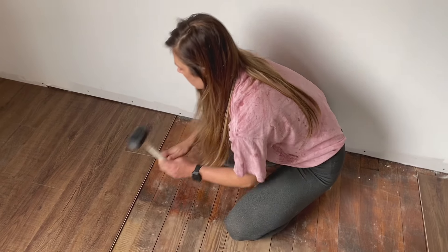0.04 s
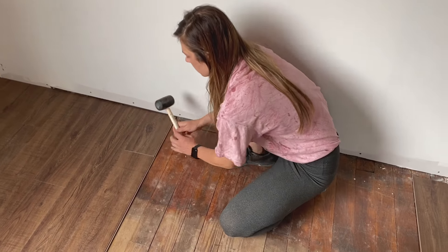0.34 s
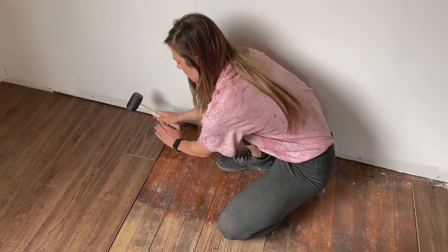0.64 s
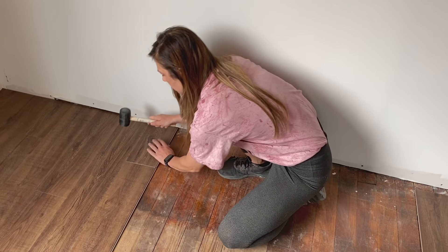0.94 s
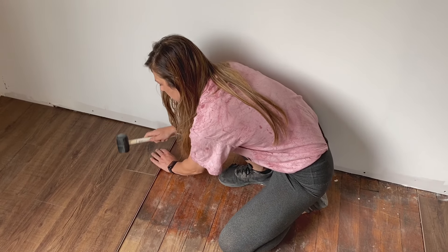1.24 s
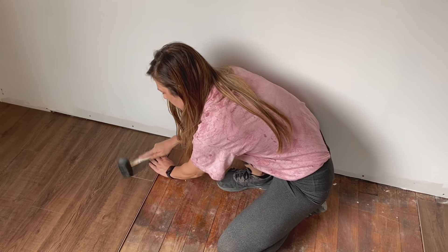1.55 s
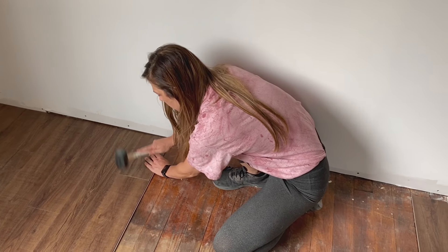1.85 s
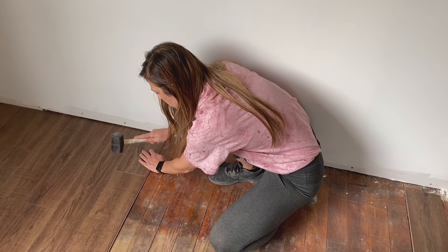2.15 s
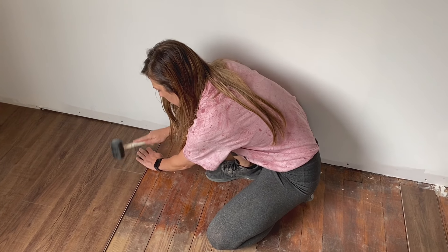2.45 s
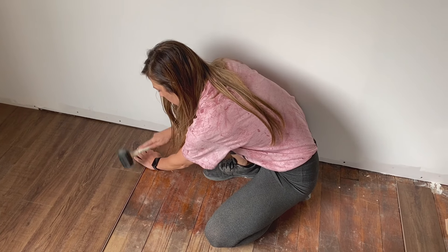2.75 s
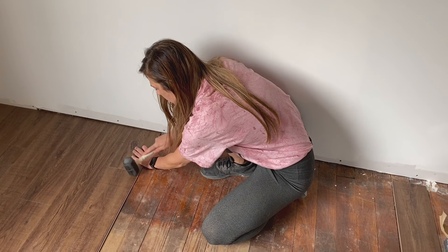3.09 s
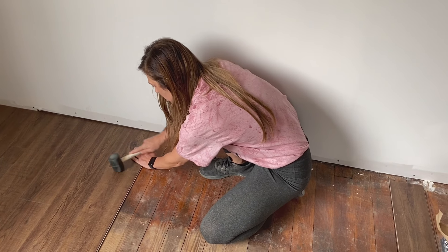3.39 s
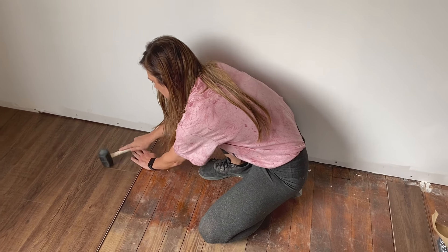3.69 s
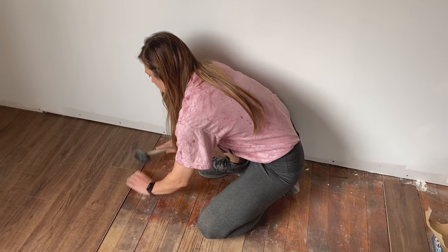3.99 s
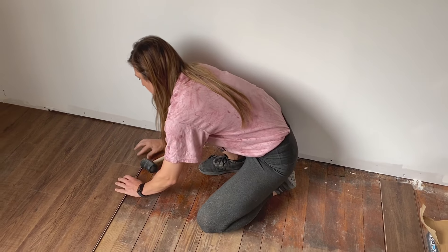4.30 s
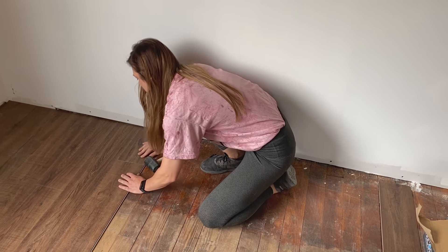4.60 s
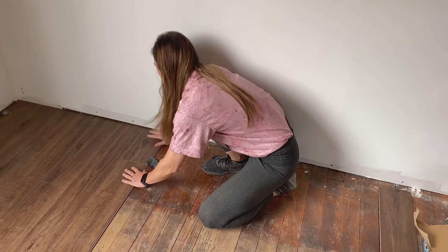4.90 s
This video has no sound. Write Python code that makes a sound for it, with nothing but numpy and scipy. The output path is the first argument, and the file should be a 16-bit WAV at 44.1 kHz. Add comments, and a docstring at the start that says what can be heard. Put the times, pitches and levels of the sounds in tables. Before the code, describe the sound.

A bare, echoing room is heard in stereo from close to a kneeling worker. A faint echo dies away at the start. From about 0.3 to 1.4 seconds come soft bumps and scuffs on the floorboards, a slight rustle of clothes and a tiny tick. At 1.5 seconds a rubber mallet begins striking a floor plank: seven loud, even blows roughly 0.35 seconds apart, the last at about 3.6 seconds. Each combines a sharp click from the joint, a woody knock and a low floor thump, and rings through the room for about a second. Just after 4 seconds the mallet is put down with a softer knock, a short skid that makes a board hum, a tick and a few dull bumps. From 4.4 to 5 seconds the worker shifts again, with faint cloth rustle, a low board rumble and a light scuff.

```python
"""Tapping a floor plank home

A bare, echoing room, heard through a stereo pair near a kneeling worker. A rubber mallet strikes
a plank in seven even blows: each clicks the joint, thumps the floor and rings through the room.
Then the mallet is put down on the boards with a short skid. Before and after, the worker
shifts about: soft bumps, scuffs and a faint rustle of clothes."""
import sys
import numpy as np
from scipy import signal
from scipy.fft import rfft, irfft, next_fast_len
from scipy.io import wavfile
from scipy.ndimage import uniform_filter1d, minimum_filter1d, map_coordinates

SR = 44100
rng = np.random.default_rng(int(sys.argv[2]) if len(sys.argv) > 2 else 0)


def generate_wav(signal):
    """Clip the signal to [-1, 1] and save it as 16-bit WAV at the path in sys.argv[1]."""
    frames = np.transpose(np.atleast_2d(signal))
    scaled = np.clip(frames, -1, 1) * 32767
    pcm = np.round(scaled).astype(np.int16)
    wavfile.write(sys.argv[1], SR, pcm)


N = 226444
T = np.arange(round(1.3 * SR)) / SR  # seconds within one sound and its tail


def amp(db):
    """Decibels to gain."""
    return 10 ** (np.asarray(db) / 20)


def along(points, hz):
    """Read (Hz, value) points on a log frequency axis."""
    freqs, values = np.transpose(points)
    return np.interp(np.log(hz + 1), np.log(freqs + 1), values)


def filtered(x, response):
    """Shape x by a response given as a function of Hz."""
    n = x.shape[-1]
    padded = next_fast_len(n + SR // 10)
    return irfft(rfft(x, padded) * response(np.fft.rfftfreq(padded, 1 / SR)), padded)[..., :n]


def fade(t60, rise):
    """An envelope that swells and then dies away; both times in seconds."""
    return np.exp(-np.log(1000) * T / t60) * (1 - np.exp(-T / rise))


def add(track, s, sound):
    """Mix a sound into the track from s seconds on."""
    start = round(s * SR)
    a, b = max(start, 0), min(start + sound.shape[-1], N)
    track[:, a:b] += sound[..., a - start:b - start]


# The room across the microphone pair. Each row: frequency in Hz, left-right correlation.
MIC_LIKENESS = [(100, 0.96), (250, 0.81), (500, 0.43), (1200, 0.065), (3500, 0.25), (6000, 0.12),
                (7000, 0.13), (8000, 0.59)]

def noise(spectrum, size=len(T)):
    """Coloured stereo noise of rms 1, alike at both microphones in the bass."""
    def response(hz):
        angle = np.arccos(np.clip(along(MIC_LIKENESS, hz), -1, 1)) / 2
        return amp(along(spectrum, hz)) * [np.cos(angle), np.sin(angle)]
    mid, side = filtered(rng.standard_normal((2, size)), response)
    pair = np.array([mid + side, mid - side])
    return pair / pair.std()


# The tail between bare walls. Each row: frequency in Hz, t60 in seconds.
ROOM_DECAY = [(60, 0.92), (200, 0.75), (500, 0.89), (1300, 1), (3000, 1), (6000, 1), (10000, 0.73),
              (14000, 0.31), (16000, 0.15)]

def reverberate(x, patchy_db=0.78):
    """Each frequency of x dies at the room's own speed, swelling and sinking unevenly in small patches."""
    hz, t, bins = signal.stft(x, SR, nperseg=256)
    patches = uniform_filter1d(rng.standard_normal(bins.shape[1:]), size=2, axis=0)
    patches = uniform_filter1d(patches, size=7, axis=1)
    unevenness = amp(patchy_db * patches / patches.std())
    decay = np.exp(-np.log(1000) * t / along(ROOM_DECAY, hz)[:, None])
    return signal.istft(bins * decay * unevenness, SR, nperseg=256)[1][:, :len(T)]


# The quiet all around the microphones. Each row: frequency in Hz, relative level in dB.
HUSH_SPECTRUM = [(22, -34), (45, -2.5), (100, -4.5), (200, -3), (400, -8.5), (1000, -18), (2700, -21.5),
                 (15000, -44)]
# A sound still hanging in the room. Each row: frequency in Hz, relative level in dB.
LINGER_SPECTRUM = [(24, -36), (40, -8), (103, -12.5), (182, -4), (364, -16), (527, -7.5), (1350, -9),
                   (2110, -16.5), (3140, -29.5), (10600, -35.5), (15000, -47)]

def room_tone(hush_db=-65, linger_db=-41):
    """The quiet room, with an echo dying away at the start."""
    track = amp(hush_db) * noise(HUSH_SPECTRUM, size=N)
    add(track, 0, amp(linger_db) * reverberate(noise(LINGER_SPECTRUM)))
    return track


# Mallet head, hands and knees meeting the floor. Each row: start in seconds, level in dB.
FLOOR_BUMPS = [(0.297, -40), (0.35, -47), (0.411, -49.5), (.7, -50), (.885, -47.5), (1.116, -47.5),
               (4.154, -24), (4.199, -27.5), (4.302, -34.5), (4.945, -45.5)]

def bumps(tail_db=-11, light_db=-40, light_hz=151, octaves_per_db=0.16):
    """Soft contacts give a dull thud and a little room; firmer ones reach higher."""
    track = np.zeros((2, N))
    for s, db in FLOOR_BUMPS:
        dull_hz = light_hz * 2 ** (octaves_per_db * (db - light_db))
        thud = noise([(35, -32), (75, 0), (max(dull_hz, 80), 0), (2 * dull_hz, -20), (20 * dull_hz, -75)])
        envelope = fade(0.29, rise=0.0014) + amp(tail_db) * fade(0.79, rise=0.0028)
        add(track, s, amp(db) * thud * envelope)
    return track


def held(t, start, end, build_s=0.11, settle_s=0.083):
    """A movement builds up to its start, holds, and settles after its end."""
    return np.exp(-np.maximum(start - t, 0) / build_s - np.maximum(t - end, 0) / settle_s)


# One list for settling in, one for leaning forward. Each row: time in seconds, relative level in dB.
CLOTH_MOVES = [
    [(0.35, -74), (0.578, -73.5), (0.728, -65.5), (1.0, -64), (1.106, -71), (1.25, -81)],
    [(4.45, -66.5), (4.506, -67.5), (4.832, -71), (4.93, -79.5), (4.944, -64), (5.1, -72.5)],
]
# Clothes near the microphones. Each row: frequency in Hz, relative level in dB.
CLOTH_SPECTRUM = [(100, 0.5), (400, 7), (1000, -0.5), (3000, -4.5), (6000, -5.5), (8000, -12.5),
                  (10500, -10), (14000, -25), (16000, -28.5)]

def clothes(gain_db=7, grain_db=1, grain_hz=40):
    """Cloth slides unevenly as the worker moves."""
    t = np.arange(N) / SR
    rustle = sum(amp(np.interp(t, *np.transpose(move))) * held(t, move[0][0], move[-1][0])
                 for move in CLOTH_MOVES)
    grain = amp(grain_db * map_coordinates(rng.standard_normal(N // 100), [t * grain_hz]))
    return amp(gain_db) * rustle * grain * noise(CLOTH_SPECTRUM, size=N)


# Brief slides down at floor level. Each row: start in seconds, level in dB, centre in Hz.
FLOOR_SCUFFS = [(0.684, -44, 320), (0.87, -50.5, 300), (4.715, -66, 11150), (4.936, -50, 449)]

def scuffs():
    """Hands, knees and a sleeve rub briefly over the boards."""
    track = np.zeros((2, N))
    for s, db, hz in FLOOR_SCUFFS:
        rub = noise([(hz / 4, -12), (hz, 0), (2 * hz, -14), (10 * hz, -30), (30 * hz, -48)])
        add(track, s, amp(db) * rub * fade(t60=0.3, rise=0.0047))
    return track


# The worker's weight moving. Each row: start and end in seconds, level in dB.
WEIGHT_SHIFTS = [(0.883, 1.002, -56.5), (4.345, 5.015, -49.5)]
# The floor under the knees. Each row: frequency in Hz, relative level in dB.
RUMBLE_SPECTRUM = [(22, -16), (60, -26), (86, 6.5), (110, -11), (135, -3), (220, -13), (500, -47),
                   (3000, -69.5)]

def board_rumble():
    """The boards rumble while the weight on them shifts."""
    t = np.arange(N) / SR
    weight = sum(amp(db) * held(t, start, end) for start, end, db in WEIGHT_SHIFTS)
    return weight * noise(RUMBLE_SPECTRUM, size=N)


# The handle and things brushed nearby. Each row: start in seconds, level in dB, centre in Hz.
SMALL_TICKS = [(1.394, -48, 690), (4.208, -32, 1620)]

def ticks(tail_db=-20):
    """Light, hard contacts and their echo."""
    track = np.zeros((2, N))
    for s, db, hz in SMALL_TICKS:
        tick = noise([(hz / 4, -16), (hz, 0), (2 * hz, -13), (4 * hz, -34), (10 * hz, -50)])
        envelope = fade(0.046, rise=0.00093) + amp(tail_db) * fade(0.86, rise=0.0045)
        add(track, s, amp(db) * tick * envelope)
    return track


# The joint, heard direct and alike in both channels. Each row: frequency in Hz, relative level in dB.
JOINT_SPECTRUM = [(300, -25), (1500, 0.5), (3500, -2.5), (5800, -2.5), (8000, -10), (10500, -4.5),
                  (14500, -13.5), (16500, -22)]

def joint(pitch_hz, gain_db=-4.5, peak_db=8, width_hz=850):
    """Tongue and groove snap together with a very short ring."""
    burst = noise(JOINT_SPECTRUM)[0]
    burst = filtered(burst, lambda hz: amp(peak_db * np.exp(-((hz - pitch_hz) / width_hz) ** 2)))
    return amp(gain_db) * burst / burst.std() * fade(t60=0.0071, rise=0.00073)


# How far single board resonances stand out. Each row: frequency in Hz, share of the ripple depth.
RIPPLE_SHARE = [(60, 0.35), (500, 0.87), (1600, 0.58), (4000, 0.29)]

def ripple(hz, depth_db=3.0, spacing_hz=70):
    """Random peaks and gaps in dB: every blow favours other resonances of the boards."""
    curve = map_coordinates(rng.standard_normal(1000), [hz / spacing_hz], mode="wrap")
    return depth_db * curve * along(RIPPLE_SHARE, hz)


def ring(modes, rise, scatter_db, detune):
    """Damped modes of alternating sign, struck a little differently each time."""
    sound = np.zeros(len(T))
    for k, (hz, db, t60) in enumerate(modes):
        gain = (-1) ** k * amp(db + scatter_db * rng.standard_normal())
        pitch_hz = hz * (1 + detune * rng.standard_normal())
        sound += gain * fade(t60, rise) * np.sin(2 * np.pi * pitch_hz * T)
    return sound


# Seven blows, then the mallet put down. Each row: start in seconds, strength in dB, click pitch in Hz.
MALLET_BLOWS = [(1.544, 0.14, 6100), (1.869, 0, 5500), (2.238, 0, 5760), (2.593, 0.12, 6000),
                (2.9652, 0, 5500), (3.3358, 0, 4170), (3.6451, 0, 6840), (4.054, -7.5, 2520)]
# The wood, heard close. Each row: frequency in Hz, relative level in dB, t60 in seconds.
EDGE_MODES = [(1130, -19, 0.0095), (1556, -17.5, 0.023), (1730, -16, 0.026), (2310, -15, 0.013),
              (2800, -18, 0.014)]  # the plank's edge, hit directly
PLANK_MODES = [(78.7, -14, 0.11), (202.6, -2, 0.066), (327.4, -4, 0.059), (431, -5, 0.077),
               (557, -4, 0.045), (750, -15.5, 0.025), (1031, -8.5, 0.031)]  # its quickly damped bending
FLOOR_MODES = [(68.3, -14.5, 0.26), (83.7, -20.5, .8), (129, -20.5, 0.85), (182.1, -18, 0.42),
               (200.4, -17.5, 0.24), (232, -25.5, 0.059), (280.7, -22.5, 0.64), (333.5, -23, 0.59),
               (361, -24.5, 0.71), (405.4, -25.5, 0.96), (425.5, -22, 0.56), (462, -24.5, 1),
               (477, -22.5, 0.46), (548, -19, 0.15), (586, -27.5, 0.24), (650, -27.5, 0.084)]  # lasting resonances of the floor and the room above it
# The room's answer from farther off. Each row: frequency in Hz, relative level in dB.
ECHO_SPECTRUM = [(22, -39.5), (45, -12), (80, 5.5), (130, -1), (250, -1), (450, 1.5), (750, -2.5),
                 (1150, -1.5), (1800, -8), (3000, -21), (4500, -25), (6000, -24), (7500, -32),
                 (10500, -30.5), (14500, -39.5), (16000, -55)]
# Bounces off wall and ceiling. Each row: delay in seconds, level in dB against the direct knock.
WALL_BOUNCES = [(.0093, -16.5), (0.0267, -15), (0.0442, -15.5)]

def mallet(echo_db=-14, early_db=-19, floor_db=-1.9, squash_s=0.001023, repeat_hz=650):
    """The joint clicks at contact; the rubber squashes, then pushes plank and floor; the room answers."""
    track = np.zeros((2, N))
    # blows on one spot repeat in the bass, not in the treble
    repeated = lambda hz: 1 / np.sqrt(1 + (hz / repeat_hz) ** 4)
    bass = filtered(noise(ECHO_SPECTRUM), repeated)
    for blow, (s, strength_db, pitch_hz) in enumerate(MALLET_BLOWS):
        # rubber stiffens under force, so knock and click grow faster than the thump;
        # blow by blow the joint closes: less thump and click, more knock
        thump_db = strength_db + 1.44 - 0.24 * blow
        knock_db = 1.65 * strength_db - 1.26 + 0.36 * blow
        click_db = 2.66 * strength_db + 0.83 - 0.4363 * blow
        balance = [(500, thump_db), (1400, knock_db), (5000, click_db)]
        treble = filtered(noise(ECHO_SPECTRUM), lambda hz: np.sqrt(1 - repeated(hz) ** 2))
        field = filtered(bass + treble, lambda hz: amp(along(balance, hz) + ripple(hz)))
        echo = amp(echo_db) * reverberate(field) * (1 - np.exp(-T / 0.0012))
        early = amp(early_db) * field * fade(t60=0.16, rise=0.0026)
        edge = ring(EDGE_MODES, rise=0.0011, scatter_db=3.5, detune=0.0052)
        plank = ring(PLANK_MODES, rise=0.0028, scatter_db=0.55, detune=0.02)
        floor = ring(FLOOR_MODES, rise=0.001, scatter_db=2, detune=0.0037)
        knock = amp((knock_db + click_db) / 2) * edge + amp(thump_db) * plank
        add(track, s, amp(click_db) * joint(pitch_hz) + early + echo)
        add(track, s + squash_s, knock + amp(thump_db + floor_db) * floor)
        for delay, db in WALL_BOUNCES:
            add(track, s + squash_s + delay, amp(db) * knock)
    return track


def skid(start_s=4.1, db=-19, hz=458, sharpness=40):
    """The rubber head skids as it is laid down and makes a board hum."""
    friction = noise([(200, -20), (hz, 0), (1000, -20)])
    hum = filtered(friction, lambda f: 1 / (1 + 1j * sharpness * (f - hz) / hz))
    track = np.zeros((2, N))
    add(track, start_s, amp(db) * hum / hum.std() * fade(t60=0.5, rise=0.0057))
    return track


def scene():
    """Everything in the room, slightly to the left of the microphones."""
    mix = mallet() + skid() + bumps() + ticks() + scuffs() + clothes() + board_rumble() + room_tone()
    return mix * amp([[0.3], [-0.3]])


def record(dry, lag_s=0.000287, ceiling=0.94, top_hz=16600):
    """The treble reaches the left channel a little late; a limiter holds peaks; the band ends steeply."""
    late_treble = lambda hz: np.exp(-2j * np.pi * hz * lag_s * (hz * lag_s > 2))
    pair = filtered(dry, lambda hz: np.array([late_treble(hz), np.ones_like(hz)]))
    needed_gain = np.minimum(1, ceiling / (np.abs(pair).max(axis=0) + 1e-9))
    gain = uniform_filter1d(minimum_filter1d(needed_gain, size=89), size=89)
    return filtered(pair * gain, lambda hz: hz < top_hz)


dry = scene()
out = record(dry)
generate_wav(out)
```